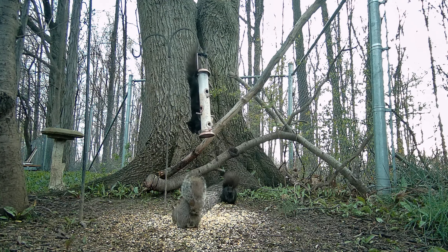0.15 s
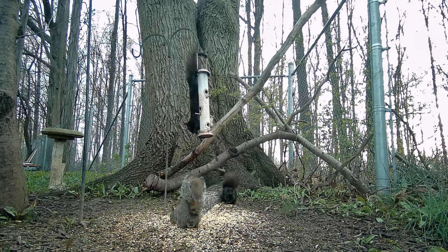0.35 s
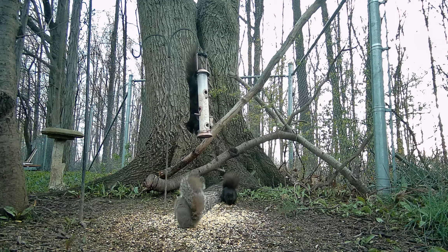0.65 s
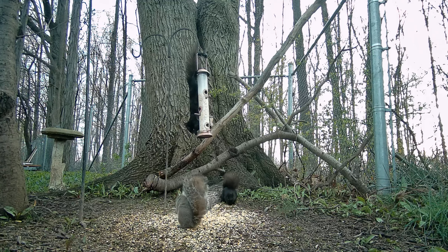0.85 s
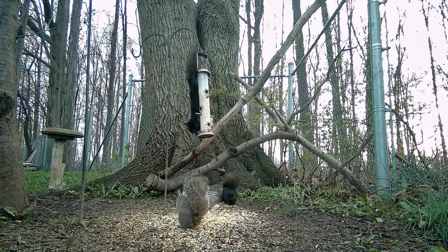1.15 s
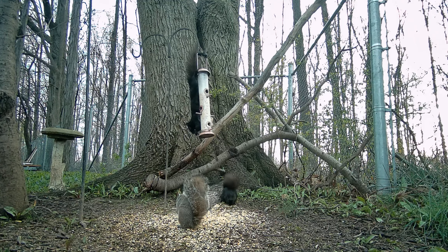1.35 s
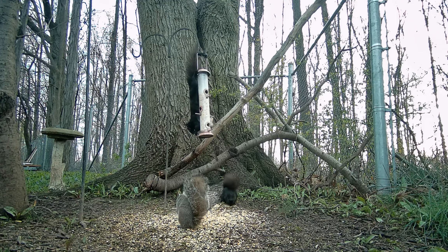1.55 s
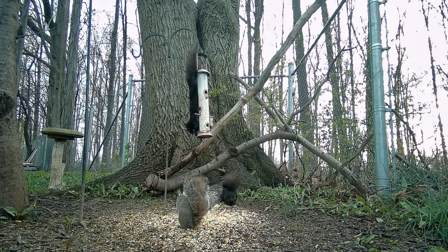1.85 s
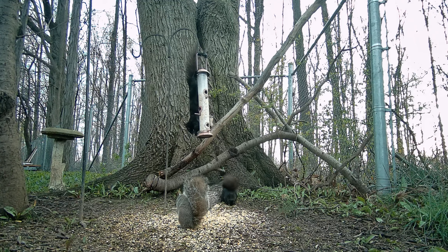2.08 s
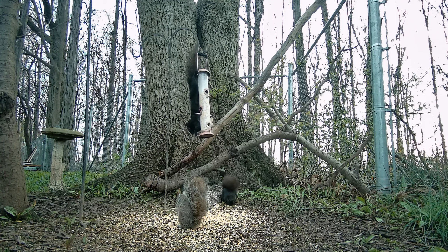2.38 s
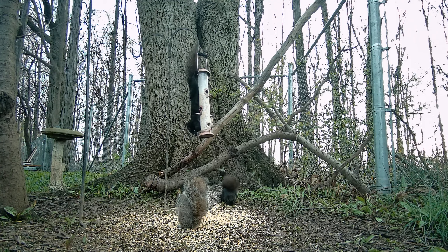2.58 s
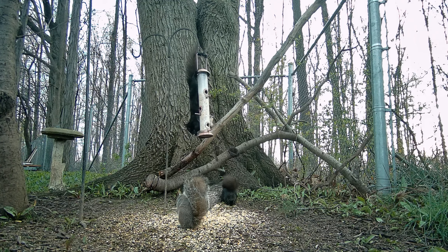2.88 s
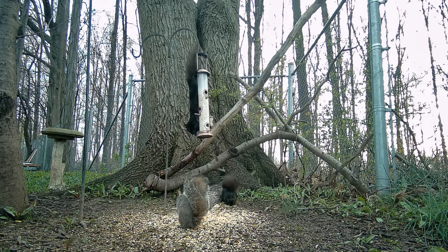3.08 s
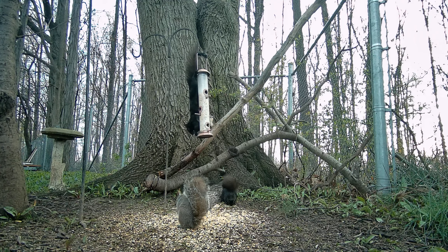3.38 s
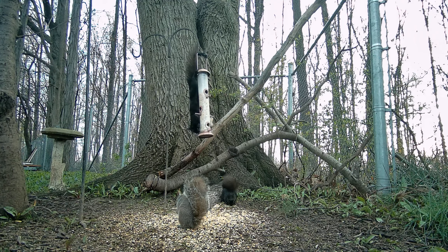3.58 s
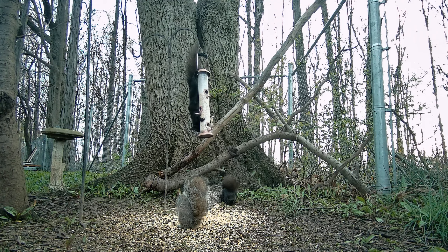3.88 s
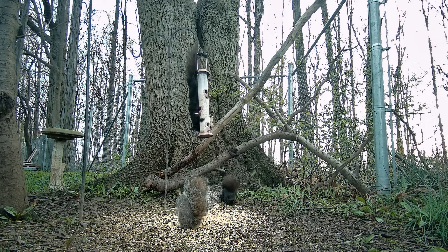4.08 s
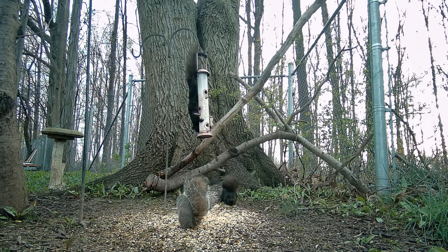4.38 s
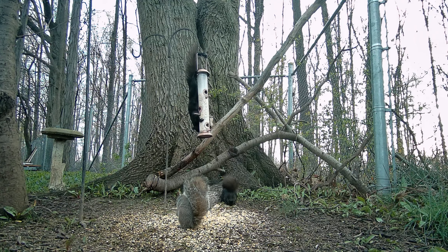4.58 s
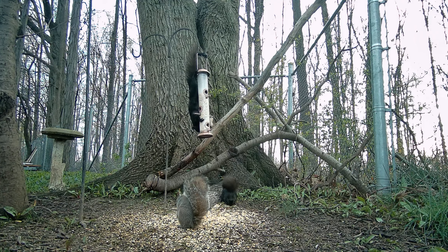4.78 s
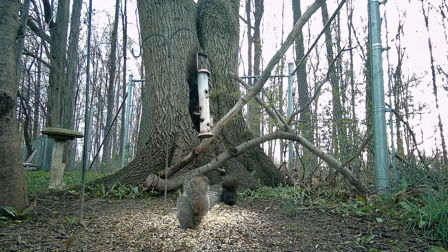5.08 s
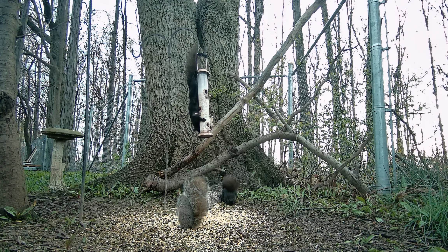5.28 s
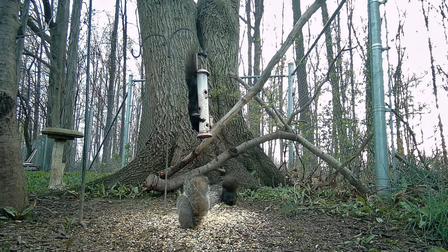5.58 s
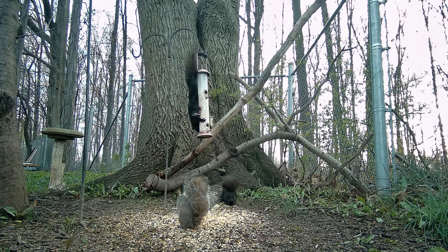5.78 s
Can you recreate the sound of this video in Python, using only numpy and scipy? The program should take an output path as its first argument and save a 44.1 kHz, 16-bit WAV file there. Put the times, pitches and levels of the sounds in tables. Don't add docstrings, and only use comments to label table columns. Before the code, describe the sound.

Steady low rumble of distant road traffic swells and eases outdoors, with engine hum drifting through and a few tiny dry ticks nearby.

```python
import sys
import numpy as np
from scipy import signal
from scipy.fft import rfft, irfft, next_fast_len
from scipy.io import wavfile

SR = 44100
rng = np.random.default_rng(int(sys.argv[2]) if len(sys.argv) > 2 else 0)


def gain_from_db(level_db):
    decades = np.asarray(level_db, float) / 20
    return 10 ** decades


def master_out(mix):
    frames = np.transpose(np.atleast_2d(mix))
    ceiling = np.clip(frames, -1, 1)
    pcm = np.round(ceiling * 32767).astype(np.int16)
    wavfile.write(sys.argv[1], SR, pcm)


N = 261954


def road():
    # f/Hz, level/dB per Hz
    rumble_colour = [(11, -26), (28, -5), (40, -11), (52, -1), (75, 3.5), (105, 3), (160, -1), (220, -4.5),
                     (290, -12), (345, -14), (385, -23), (600, -33.5), (780, -49.5)]
    # f/Hz, level/dB per Hz
    tyre_colour = [(190, -31), (330, -3.5), (394, -8), (471, -5.5), (571, -8), (910, -4), (1470, -11.5),
                   (1930, -11.5), (2650, -22), (3120, -24.5), (7110, -46), (7820, -48.5), (8730, -56),
                   (11300, -100), (19200, -120)]
    # t/s, level/dB
    load = [(0, -2.5), (.3, -3.5), (.63, -1), (.94, -1), (1.12, 4.5), (1.5, -3), (1.7, 2.5), (1.85, -1.5),
            (2.2, -0.5), (2.55, -4), (2.98, 2.5), (3.34, -5), (3.85, 2), (4.3, 2), (4.6, 0), (5.14, 3.5),
            (5.5, 0), (5.94, 0.5)]
    # f/Hz, share of the load, gain as the traffic nears/dB per s
    exhaust_parts = [(40, 0.67, 0.2), (84.6, 1.1, -0.2), (143, 0.2, 0.63), (220, .4, 1.5), (310, .3, 1)]
    # f/Hz, share of the load, gain as the traffic nears/dB per s
    tyre_parts = [(1300, .05, .25), (3200, .02, 0.3)]

    load_db, = in_time(load)
    rumble = roar(rumble_colour, exhaust_parts, load_db, patchy_db=1.44)
    tyres = roar(tyre_colour, tyre_parts, load_db, patchy_db=0.84)
    return gain_from_db(-27.0) * rumble + gain_from_db(-37.5) * tyres


def roar(spectrum, parts, load_db, patchy_db):
    t = np.arange(N) / SR
    parts_hz = [hz for hz, _, _ in parts]
    levels_db = [share * load_db + gain_db * t for _, share, gain_db in parts]
    moves_db = [db - np.mean(db) for db in levels_db]

    size = next_fast_len(N)
    hz = np.arange(1, size // 2 + 2) * SR / size
    low_hz, high_hz = spectrum[0][0], spectrum[-1][0]
    inside = (hz > low_hz) & (hz < high_hz)
    coloured = rfft(rng.standard_normal(size)) * gain_from_db(at_hz(spectrum, hz)) * inside

    place = 3 * np.log2(hz / low_hz)
    out = np.zeros(N)
    for k in range(int(place[inside].max()) + 2):
        centre_hz = low_hz * 2 ** (k / 3)
        shares = [at_hz(np.c_[parts_hz, one], centre_hz) for one in np.eye(len(parts_hz))]
        overlap = np.clip(1 - abs(place - k), 0, 1)
        layer = irfft(coloured * overlap, size)[:N]
        level_db = np.dot(shares, moves_db) + patchy_db * drift(3.5)
        out += gain_from_db(level_db) * layer
    return rms_one(out)


def drone():
    # t/s, f/Hz
    pitch = [(0, 86), (1.1, 85), (2.2, 84.3), (2.7, 83.5), (3.2, 79.7), (4.1, 78.5), (4.7, 80.2),
             (5.2, 80.4), (5.94, 86)]
    # t of the peak/s, level/dB, half length/s
    drone_swells = [(.72, -32, 0.21), (1.12, -25, .13), (1.6, -30, 0.072), (1.92, -27.5, 0.15),
                    (2.25, -22.5, 0.17), (2.52, -29, 0.2), (2.9, -32.5, 0.2), (3.62, -31.5, 0.17),
                    (4.1, -30, 0.23), (4.7, -22, 0.25), (5.12, -27.5, .1), (5.42, -36, .1),
                    (5.76, -28, 0.12)]
    hz, = in_time(pitch)
    return tone(hz, swells(drone_swells, rest_db=-46), wander_hz=0.34, flutter_db=1.5)


def lorry():
    # t/s, f/Hz
    cycle = [(0, 27.7), (1, 27.4), (2.5, 26.8), (3.3, 25.5), (4.1, 26), (4.7, 25.75), (5.5, 25.4),
             (5.94, 25.25)]
    order_swells = { 5: [(.6, -36.5, 0.25), (1.0, -34, .1), (1.4, -39, 0.086), (1.8, -36, 0.1),
                    (2.25, -30.5, .15), (2.58, -27, 0.21), (3.0, -35, 0.13), (3.42, -32.5, .18),
                    (4.02, -29, 0.17), (4.5, -27.5, 0.37), (4.95, -40, 0.14), (5.4, -31, 0.14)],
                    7: [(1.7, -39, 0.13), (2.2, -41, 0.078), (3.15, -51, .15), (3.8, -41.5, 0.086),
                    (4.55, -30, 0.28), (5.15, -40, 0.23), (5.7, -45, 0.36)], 9: [(2.25, -45.5, 0.11),
                    (2.8, -40.5, 0.11), (3.3, -45.5, 0.18), (4.0, -33, 0.19), (4.4, -29.5, .13),
                    (4.85, -33.5, 0.27), (5.3, -29.5, 0.38)], 10: [(.6, -46, 0.088), (4.6, -38.5, 0.43),
                    (5.2, -35, 0.16), (5.8, -41, 0.14)]}
    cycle_hz, = in_time(cycle)
    out = np.zeros(N)
    for order, rows in order_swells.items():
        out += tone(order * cycle_hz, swells(rows, rest_db=-54), wander_hz=0.52, flutter_db=2.0)
    return out


def gear_whine():
    # t/s, f/Hz
    pitch = [(0, 470), (1, 467.7), (2.4, 464), (3.4, 453), (4.1, 447), (4.6, 444.2), (5.1, 440),
             (5.94, 441.5)]
    # t of the peak/s, level/dB, half length/s
    whine_swells = [
        (.8, -52, 0.14),
        (3.7, -51, .3),
        (4.55, -43.5, .12),
        (4.9, -51, .07),
        (5.1, -45, .07),
        (5.65, -45.5, 0.083),
        (5.93, -49, .1),
    ]
    hz, = in_time(pitch)
    return tone(hz, swells(whine_swells, rest_db=-61), wander_hz=1.2, flutter_db=3.0)


def passing_tones():
    # t of the peak/s, f/Hz, level/dB, half length/s
    surfacing = [(.46, 276, -45.5, .2), (.93, 328.2, -41, .15), (.94, 121, -35, .2),
                 (1.28, 513.5, -51, .08), (1.58, 103, -31, .06), (1.71, 348, -48, .4),
                 (1.82, 278, -42.5, .12), (2.42, 635.5, -48.5, .12), (2.47, 355.5, -49, .12),
                 (2.5, 679, -50, .08), (2.65, 634.5, -49.5, .1), (2.94, 51, -36, .15),
                 (2.95, 634.5, -52, .1), (3.2, 511.5, -50, .08), (3.36, 97.4, -35, .4),
                 (3.48, 316.5, -47, .25), (4.18, 340, -45, .08), (4.51, 309, -43.5, .12),
                 (4.64, 95, -35.5, .3), (4.68, 209, -34, .07), (4.91, 306, -39.5, .18),
                 (5.4, 328, -38, .15), (5.48, 203, -33, .13), (5.57, 152.5, -35, .35),
                 (5.86, 326.5, -42, .15), (.7, 270, -43, .12), (1.1, 232, -42, .18), (1.4, 300, -45, .2),
                 (2.3, 32, -40, .2), (4.75, 152, -36, .12)]
    t = np.arange(N) / SR
    stir = 0.08 * drift(3.0)
    out = np.zeros(N)
    for peak_s, hz, level_db, half_s in surfacing:
        bell = np.exp(-((t - peak_s) / half_s) ** 2)
        out += bell * np.sqrt(2) * gain_from_db(level_db) * np.sin(2 * np.pi * (hz * t + stir))
    return out


def tone(hz, level_db, wander_hz, flutter_db):
    turns = np.cumsum(hz + wander_hz * drift(4.0)) / SR + rng.random()
    strength = np.sqrt(2) * gain_from_db(level_db + flutter_db * drift(8.4))
    return strength * np.sin(2 * np.pi * turns)


def swells(rows, rest_db):
    t = np.arange(0, N / SR + .01, .005)
    heights = [gain_from_db(level_db) * np.exp(-((t - peak_s) / half_s) ** 2) for peak_s, level_db, half_s in rows]
    power = gain_from_db(rest_db) ** 2 + np.sum(np.square(heights), axis=0)
    return in_time(np.c_[t, 10 * np.log10(power)])[0]


def husks():
    # t of the peak/s, peak level/dB, f/Hz, width/Hz
    rings = [(.2948, -33, 7050, 1800), (.2951, -39, 5700, 700), (.2952, -39, 3900, 2400),
             (.2953, -47, 8400, 800), (.7109, -55, 7000, 3000), (.9403, -54, 5600, 700),
             (.9406, -50, 3900, 800), (1.188, -65, 7200, 1000), (1.4421, -39.5, 5560, 430),
             (1.4432, -44, 3600, 1500), (1.4412, -58, 7200, 2000), (1.4464, -59, 7100, 900),
             (1.4513, -56, 7700, 1700), (1.4544, -58.5, 7200, 700), (1.7618, -57, 6300, 1500),
             (1.9525, -60, 7200, 1500), (1.9592, -53, 6900, 1300), (1.9590, -57, 5200, 1200),
             (1.9589, -67, 8800, 900), (3.012, -61, 7800, 2500), (3.0615, -52.5, 7500, 1800),
             (3.0609, -55, 5300, 1200), (3.7577, -58, 5700, 800), (3.7578, -64, 7200, 800),
             (5.3022, -57, 7500, 2500), (5.4012, -59, 5700, 800), (5.4544, -56, 5600, 700),
             (5.909, -55, 8000, 1800), (5.9094, -54, 5200, 1000)]
    scatter_db, scatter_t60_s = -27, .04
    filter_lag_s = .0005
    t = np.arange(SR // 20) / SR
    out = np.zeros(N + SR)
    for peak_s, peak_db, hz, width_hz in rings:
        rise_s = 2 / (np.pi * width_hz)
        envelope = (t / rise_s * np.exp(1 - t / rise_s)) ** 2
        crack = gain_from_db(peak_db) * envelope * np.sin(2 * np.pi * hz * t)
        noise = rng.standard_normal(len(t))
        scatter = gain_from_db(scatter_db - 60 * t / scatter_t60_s) * noise * (t > .002)
        start = round((peak_s - rise_s - filter_lag_s) * SR)
        out[start:start + len(t)] += crack + signal.fftconvolve(crack, scatter)[:len(t)]
    return out[:N]


def in_time(rows):
    s, *columns = np.transpose(rows)
    return [np.interp(np.arange(N) / SR, s, c) for c in columns]


def at_hz(points, hz):
    points_hz, values = np.transpose(points)
    return np.interp(np.log(hz), np.log(points_hz), values)


def rms_one(x):
    return x / np.sqrt(np.mean(x ** 2) + 1e-20)


def drift(rate):
    r = np.exp(-80 * np.pi * rate / SR)
    noise = rng.standard_normal(N // 40 + 2002)
    slow = signal.lfilter([1], [1, -2 * r, r * r], noise)[2000:]
    return np.interp(np.arange(N) / 40, np.arange(len(slow)), rms_one(slow))


def scene():
    engines = drone() + gear_whine() + lorry() + passing_tones()
    return (road() + engines + husks())[None]


def band_limit(x):
    return signal.sosfilt(signal.butter(12, 8930, fs=SR, output="sos"), x)


def record(dry):
    sample_hz, input_cut_hz, output_cut_hz = 16000, 7990, 7750
    input_filter = signal.cheby1(10, 1, input_cut_hz, fs=SR, output="sos")
    taken = signal.sosfilt(input_filter, dry)
    mirrored = taken * (1 + 2 * np.cos(2 * np.pi * sample_hz * np.arange(N) / SR))
    output_filter = signal.butter(16, output_cut_hz, fs=SR, output="sos")
    dull = signal.sosfilt(output_filter, mirrored)
    return band_limit(dull)


dry = scene()
out = record(dry)
master_out(out)
```